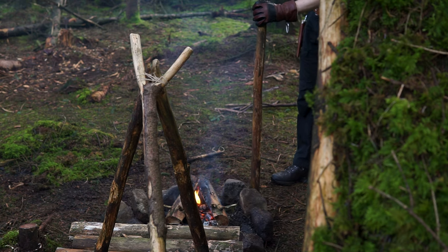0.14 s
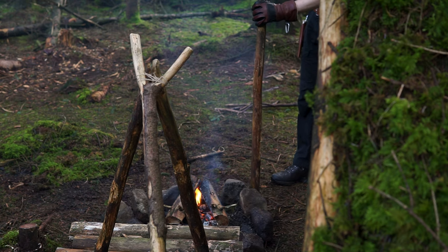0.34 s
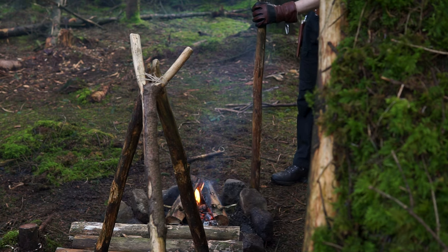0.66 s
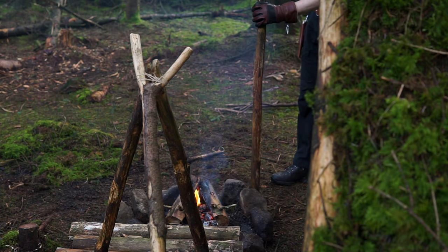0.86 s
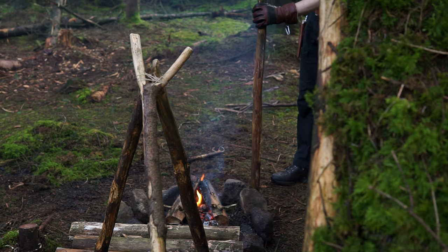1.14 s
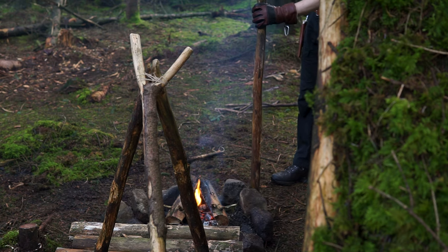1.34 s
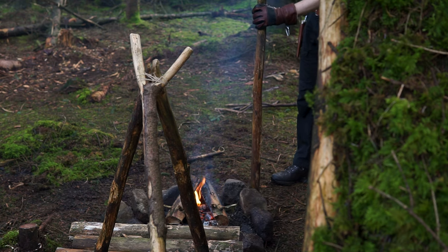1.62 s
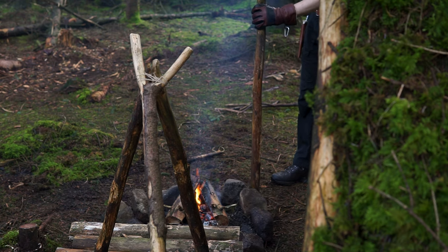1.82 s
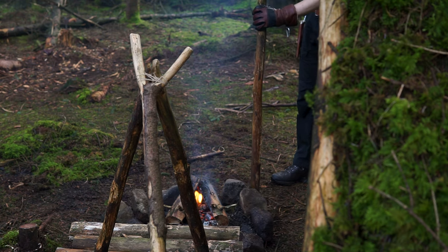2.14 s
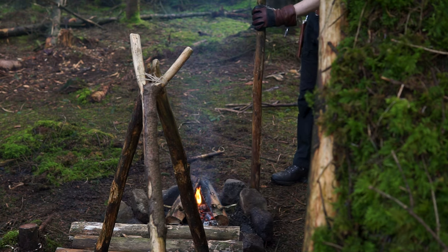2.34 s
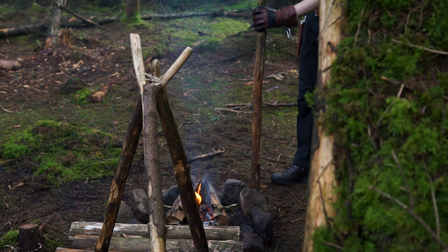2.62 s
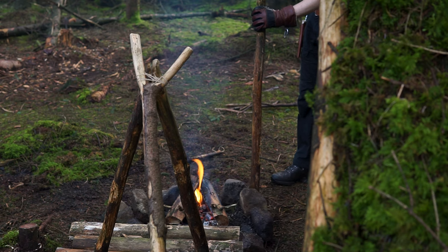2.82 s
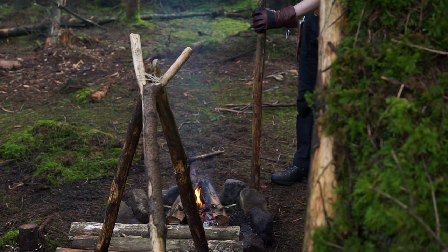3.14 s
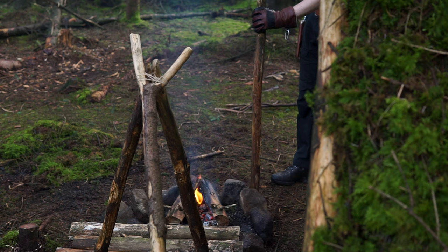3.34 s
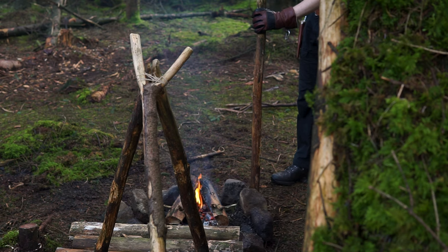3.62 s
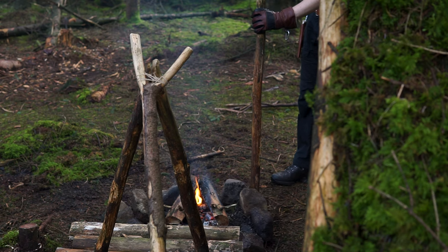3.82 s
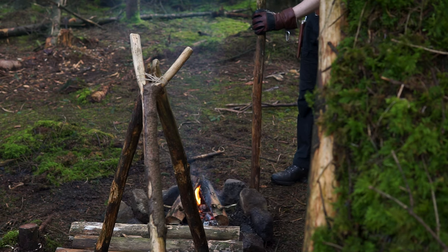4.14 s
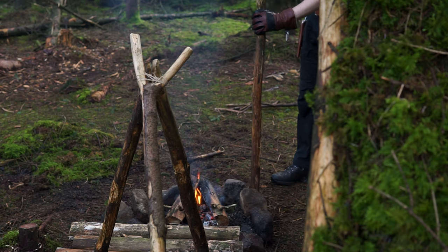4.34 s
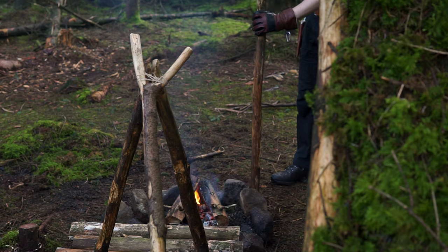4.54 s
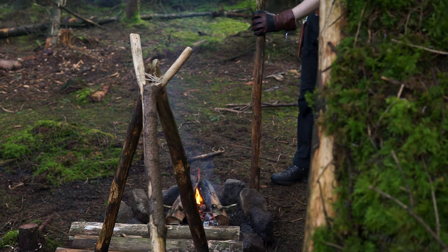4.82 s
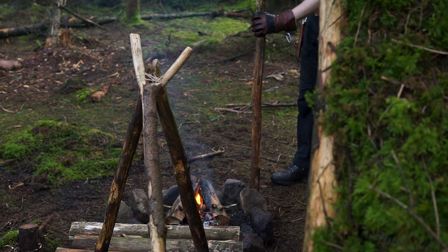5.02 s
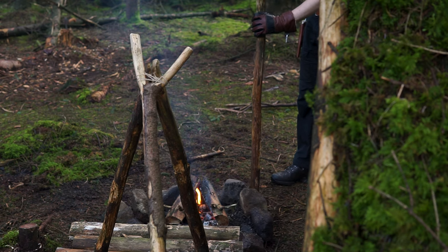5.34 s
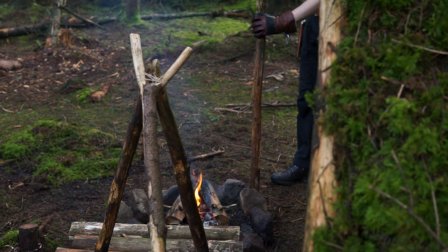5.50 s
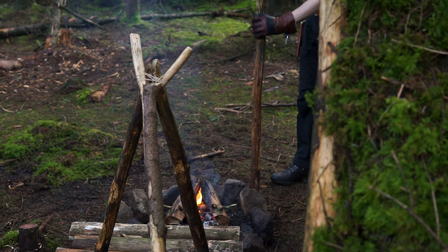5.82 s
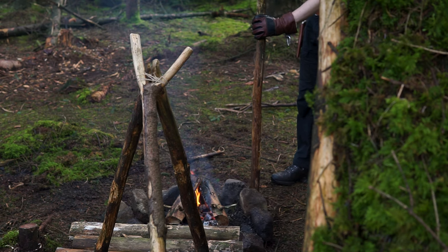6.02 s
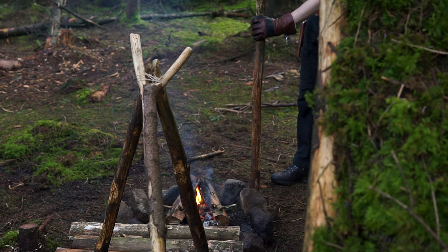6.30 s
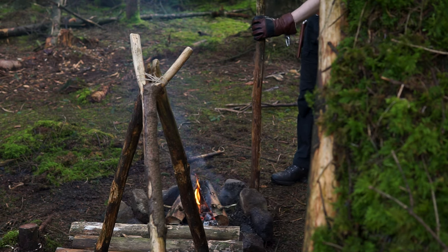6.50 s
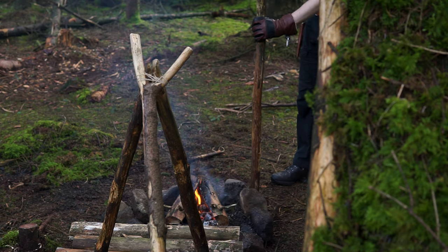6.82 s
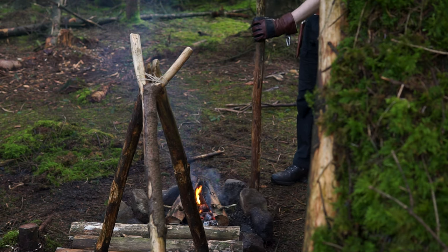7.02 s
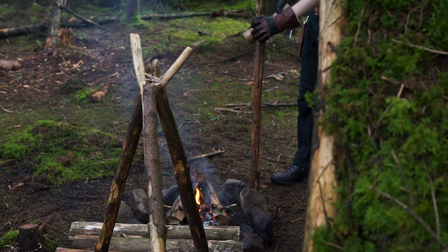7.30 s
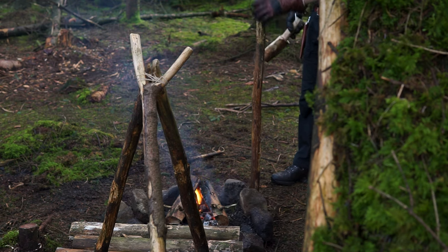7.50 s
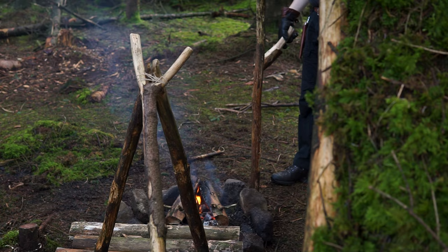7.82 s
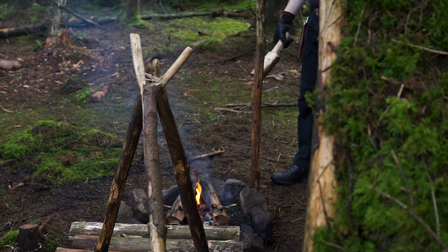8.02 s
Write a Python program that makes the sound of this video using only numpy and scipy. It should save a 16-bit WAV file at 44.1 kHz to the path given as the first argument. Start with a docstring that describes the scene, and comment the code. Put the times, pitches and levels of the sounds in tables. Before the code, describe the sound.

A wooden mallet drives a stake into forest ground, very close to the microphone. Fifteen blows fall evenly, about two a second, from 0.2 to 6.9 seconds. Each is a loud, slightly overloaded wooden knock with a brief ring and a bright crack, followed at once by a soft, dull bounce and a short echo from the trees. The hardest land at about 3 and 4 seconds, and the crack grows a little brighter as the stake sinks. Underneath runs a faint murmur of air, with a barely audible low gust from about 1 to 4 seconds. A small fire nearby ticks lightly throughout, with clearer dry snaps around 2.1, 3.6 and 7.8 seconds. After the hammering ends, a sleeve rustles quietly in a few short strokes from about 7.5 to 8.1 seconds.

```python
"""Driving a stake by a camp fire

Close to the microphones, a wooden mallet drives a stake into the forest floor: fifteen blows, two a
second. Each rings the stake and overloads the input; the mallet bounces and lands again softly, and the
trees scatter the sound back. The deeper the stake, the brighter the crack and the longer the bounce.
A small fire snaps over a murmur of air, one gust passes, and a sleeve rustles after the last blow."""
import sys
import numpy as np
from scipy import signal
from scipy.io import wavfile
from scipy.ndimage import uniform_filter1d

SR = 44100
rng = np.random.default_rng(int(sys.argv[2]) if len(sys.argv) > 2 else 0)


def file_out(sig):
    """Save sig as 16-bit WAV at sys.argv[1]."""
    # one column per channel
    cols = np.atleast_2d(sig).T
    # limit, then scale
    lim = np.clip(cols, -1, 1)
    pcm = np.round(lim * 32767).astype(np.int16)
    wavfile.write(sys.argv[1], SR, pcm)


N = 359856

# spectrum of the forest air: f/Hz, level/dB
AIR_SPECTRUM = [(18, -46.5), (30, -3.5), (505, -0.5), (622, -7.5), (709, -5.5), (897, -7.5), (1080, -7.5),
                (1170, -11.5), (2360, -20), (2550, -21.5), (3880, -25.5), (5310, -24), (6210, -28.5),
                (12300, -26.5), (15500, -32.5)]
# how alike the air is at the two microphones: f/Hz, likeness
AIR_LIKENESS = [(60, 0.96), (180, 1), (550, 0.24), (1650, 0.18), (4970, 0.17), (15000, 0.97)]
# strokes of the sleeve: t/s, length/s, level/dB, upper band edge f/Hz
SLEEVE_STROKES = [(7.451, .14, -68, 2400), (7.655, .15, -59.5, 2900), (7.984, .19, -58, 1750),
                  (8.09, .03, -50, 1650)]
# clear snaps of the fire: t/s, level/dB, brightness f/Hz, left-right/dB
FIRE_SNAPS = [(1.1902, -33, 5170, -2), (1.9937, -33.5, 8600, 3), (2.1179, -16.5, 9650, 2),
              (3.463, -34.5, 7950, 3), (3.5567, -21, 5000, 1), (3.6251, -12.5, 5090, 1.5),
              (4.3552, -32.5, 8350, 3.5), (5.5807, -30.5, 4050, 6), (5.828, -37.5, 8990, 0),
              (6.4801, -33, 4640, 10), (7.012, -34, 5120, 3), (7.051, -40, 11100, 1.5),
              (7.8423, -27.5, 10670, -2)]
# what the trees send back of the knock: f/Hz, level/dB
KNOCK_ECHO = [(100, -50.5), (300, -26), (450, -24.5), (600, -17.5), (780, -18), (1050, -15.5), (1350, -23),
              (1700, -24.5), (2200, -35), (3000, -40), (6000, -53.5), (15000, -71)]
# what they send back of the crack: f/Hz, level/dB
CRACK_ECHO = [(600, -43.5), (1500, -28), (2700, -29), (4000, -28), (6500, -28.5), (10000, -30.5),
              (15000, -35)]
# how long the echo lasts: f/Hz, t60/s
ECHO_T60 = [(200, 0.92), (900, 0.54), (2000, 0.66), (5000, .52), (10000, 0.3), (15000, .25)]
# how alike the echo is at the two microphones: f/Hz, likeness
ECHO_LIKENESS = [(60, 0.97), (180, 0.33), (550, 0.54), (1650, 0.42), (4970, 0.14), (15000, 0.42)]
# bending modes of the stake: f/Hz, level/dB, t60/ms before soil damping, left-right/dB,
# change from first blow to last/dB
STAKE_MODES = [(135, -6.5, 26, -1, -4), (194.3, -8.5, 59, 0.7, -2.5), (283.3, -4, 47.1, -5.5, 1),
               (305.5, 10.5, 12.2, 4.5, -2.5), (339, -1.5, 55, -8.5, 1.5), (465.8, 20, 10, -3, -1.37),
               (585.7, 14, 34.2, -3.5, 0.77), (615.1, 7, 40, 2.3, -0.35), (654.5, -0.92, 37, -9.5, 1.63),
               (740.6, 17.5, 16.2, 1.2, -0.8), (826.3, 8, 28, -3.5, 0.5), (873.4, 6.5, 46, -6.5, 0.5),
               (891, -4, 110, 5.5, 0.33), (1111.2, -5.5, 80, -3, -4.5), (1126.6, -2.54, 43.8, 1.86, -2.5),
               (1183, 4, 24, 3.5, -1.0), (1383, -9.5, 68, -4.5, -3), (1478.7, 5, 20, 1.46, -1.1),
               (1598, -6.5, 54.3, 5.5, -0.94), (1736.6, 9.5, 27.1, -0.5, -2.5),
               (1860, 9.5, 15.1, -1.5, -1.25), (2014.3, 19.5, 12.0, -1.5, -1.44),
               (2249, 2, 16.5, -0.06, -2.5), (2556, 14, 10, -5.5, -0.9), (2750.6, 13, 10, 3.5, -2.1),
               (3238, -5, 26, -8.5, -1.25)]
# mallet blows: t/s, force/dB, crack level/dB, second touch level/dB
MALLET_BLOWS = [(.1524, -.8, -10.5, -26), (.6351, 1.3, -3.5, -17.5), (1.1142, 1.7, -6.5, -24),
                (1.584, .3, -6, -19), (2.0676, 1, -6.5, -22), (2.5461, 1.6, -7, -20),
                (3.0282, 2.3, -1, -14), (3.5105, -1.4, -12, -33.5), (3.9985, 3.8, -.5, -14.3),
                (4.4814, -.5, -10.5, -27), (4.9643, -1.2, -16, -34), (5.439, 1.7, -5.5, -28),
                (5.9158, -1, -10, -31), (6.3886, -.9, -10.5, -27), (6.8605, .5, -11, -25)]


def draught(start_db=-55, fade_db_per_s=.25, gust_db=8, band_hz=(15, 52)):
    """Moving air buffets the microphones, far down in the bass; one gust rises, holds and falls."""
    t = np.arange(N) / SR
    gust = np.interp(t, [.95, 1.25, 3.7, 4.3], [0, 1, 1, 0])
    buffets = filtered(rng.standard_normal(N) + .5 * rng.standard_normal((2, N)), band_hz, "band")
    return gain_of(start_db - fade_db_per_s * t + gust_db * gust) * evened(buffets)


def air(start_db=-54.4, fade_db_per_s=.22, patchy_db=1.0):
    """All around, a low murmur of moving air with drifting patches and a faint hiss, slowly calming."""
    def field_db(hz, t):
        patches = uniform_filter1d(rng.standard_normal((len(hz), len(t))), size=12, axis=0)
        drifting = evened(uniform_filter1d(patches, size=10, axis=1))
        return read(AIR_SPECTRUM, hz) + patchy_db * drifting
    level_db = start_db - fade_db_per_s * np.arange(N) / SR
    return gain_of(level_db) * evened(noise_pair(N, AIR_LIKENESS, field_db, size=2048))


def sleeve(grain_db=3):
    """Cloth slides in short, grainy strokes as the mallet is lowered."""
    out = np.zeros((2, N))
    for s, length, db, hz in SLEEVE_STROKES:
        progress = np.linspace(0, 1, round(length * SR))
        roughness = evened(uniform_filter1d(rng.standard_normal(len(progress)), size=150))
        rub = rng.standard_normal(len(progress)) + .55 * rng.standard_normal((2, len(progress)))
        rustle = filtered(rub * gain_of(grain_db * roughness), [hz * .72, hz], "band", order=1)
        add(out, s, gain_of(db) * np.sin(np.pi * progress ** .78) * evened(rustle))
    return out


def snap(brightness_hz, t60=.0076, scatter_db=-24, scatter_t60=.03):
    """A pocket of gas bursts in the firewood: a broad, dry tick and its scatter off logs and stones."""
    t = np.arange(SR // 20) / SR
    decay = gain_of(-60 * t / t60) + gain_of(scatter_db - 60 * t / scatter_t60)
    burst = decay * (rng.standard_normal(len(t)) + 1.7 * rng.standard_normal((2, len(t))))
    top_hz = min(1.2 * brightness_hz + 2000, 12000)
    tick = filtered(filtered(burst, 4400, "high"), top_hz, "low")
    return 3.5 * tick / np.linalg.norm(tick)  # peaks near 1


def fire(ticks_per_s=16, faintest_db=-55, spread_db=13):
    """The small fire nearby: a few clear snaps among many faint ticks at random moments."""
    out = np.zeros((2, N))
    for s, db, hz, pan_db in FIRE_SNAPS:
        add(out, s, gain_of(db) * panned(pan_db) * snap(hz))
    for when, size, pitch in rng.random((round(ticks_per_s * N / SR), 3)):
        add(out, when * N / SR, gain_of(faintest_db + spread_db * size ** 2) * snap(6000 + 5000 * pitch))
    return out


def forest_echo(echo_db, crack_db, top_hz, build_s=.014, uneven_db=1.23):
    """Trunks farther off blur the knock and crack; their echoes build, then die away, treble first."""
    def field_db(hz, t):
        knock = gain_of(read(KNOCK_ECHO, hz) + echo_db)
        splinter = gain_of(read(CRACK_ECHO, hz) + crack_db) / np.hypot(1, (hz / top_hz) ** 3)
        # the trunks stand at uneven distances, so their echoes come in clumps
        clumps = evened(uniform_filter1d(rng.standard_normal(len(t)), size=4))
        return 20 * np.log10(np.hypot(knock, splinter)) - 60 * t / read(ECHO_T60, hz) + uneven_db * clumps
    t = np.arange(SR * 3 // 4) / SR
    build_up = 1 - np.exp(-(t / build_s) ** 2)
    return build_up * noise_pair(len(t), ECHO_LIKENESS, field_db, size=512)


def second_touch(ring, touch_db, low_hz=190, soft_hz=850, damped_t60=.022):
    """The mallet lands again slowly and stays on the stake: a damped thud, the softer the duller."""
    t = np.arange(ring.shape[1]) / SR
    top_hz = soft_hz * gain_of(touch_db / 4)
    thud = filtered(ring * gain_of(-60 * t / damped_t60), low_hz, "high")
    return gain_of(touch_db) * filtered(thud, top_hz, "low", order=3)


def crack(top_hz, trim_db=-17, low_hz=1800, t60=.13):
    """Fibres crush where the mallet meets the end grain: a short bright burst."""
    t = np.arange(SR // 8) / SR
    grains = rng.standard_normal(len(t)) + .6 * rng.standard_normal((2, len(t)))
    burst = filtered(grains * gain_of(trim_db - 60 * t / t60), low_hz, "high")
    return filtered(burst, top_hz, "low")


def stake_ring(depth, scatter_db=.87, rise_ms=.537, soil_t60_ms=300):
    """The struck stake rings in its bending modes, and the soil damps each a little more."""
    ms = np.arange(SR // 8) * 1000 / SR
    ring = np.zeros((2, len(ms)))
    for hz, db, t60_ms, pan_db, change_db in STAKE_MODES:
        # the mallet never lands on quite the same spot, which matters most to the high modes
        level_db = db + change_db * depth + scatter_db * rng.standard_normal() * hz / 2000
        # bending waves are dispersive: low modes arrive late, so the knock sweeps downward
        age_ms = np.maximum(ms - .943 * (np.sqrt(1000 / hz) - .5), 0)
        envelope = gain_of(level_db - 60 * age_ms / t60_ms) * (1 - np.exp(-age_ms / rise_ms))
        ring -= panned(pan_db) * envelope * np.sin(2 * np.pi * hz * age_ms / 1000)
    ring *= gain_of(-60 * ms / soil_t60_ms)
    echoed = ring.copy()
    add(echoed, .00266, .225 * ring)  # the trunk alongside throws back one close echo
    return echoed


def mallet():
    """Close up, each blow rings and cracks the stake; the mallet drops back and the forest answers."""
    out = np.zeros((2, N))
    depths = np.linspace(-.5, .5, len(MALLET_BLOWS))  # the stake sinks; 0 is halfway
    for depth, (s, force_db, crack_db, touch_db) in zip(depths, MALLET_BLOWS):
        # a firmer stake and a harder blow crack brighter
        top_hz = 5500 * 2 ** (1.2 * depth + .18 * force_db)
        # a firmer stake throws the mallet higher; a hard swing follows through
        bounce_s = .0524 + .0189 * depth - .0019 * force_db
        # the echo follows the force and fades as less of the stake stands free
        echo_db = -.7 - 1.4 * depth + .8 * force_db
        ring = stake_ring(depth)
        add(out, s, gain_of(force_db) * ring + gain_of(crack_db) * crack(top_hz))
        add(out, s + bounce_s, second_touch(ring, touch_db))
        add(out, s, forest_echo(echo_db, crack_db, top_hz))
    # the sound reaches the right microphone a moment after the left
    return np.array([out[0], np.roll(out[1], 1)])


def scene():
    """A microphone pair in the forest: air all around, sleeve and fire nearby, the stake up close."""
    return draught() + air() + sleeve() + fire() + mallet()


def record(dry, overload=.95, wind_filter_hz=230, edge_hz=15950):
    """The input overloads, the wind filter tilts the flat tops, and peaks clip again at full scale."""
    overloaded = np.clip(dry, -overload, overload)
    clipped = np.clip(filtered(overloaded, wind_filter_hz, "high"), -1, 1)
    treble_cut = signal.firwin(511, edge_hz, window=("kaiser", 7), fs=SR)
    return signal.oaconvolve(clipped, treble_cut[None], "same")


def gain_of(db):
    """Decibels to a factor."""
    return 10 ** (np.asarray(db) / 20)


def evened(x):
    """Scales to an rms of 1."""
    return x / np.sqrt(np.mean(x ** 2) + 1e-20)


def read(points, hz):
    """Reads a table along a log-frequency axis."""
    f, value = np.transpose(points)
    return np.interp(np.log(hz + 1), np.log(f), value)


def add(mix, s, sound):
    """Adds a sound to both channels at time s."""
    part = mix[:, max(round(s * SR), 0):][:, :sound.shape[-1]]
    part += sound[..., :part.shape[1]]


def panned(pan_db):
    """Left and right gains for a level difference."""
    return gain_of(np.array([[pan_db], [-pan_db]]) / 2)


def filtered(x, hz, kind, order=2):
    """Butterworth filter."""
    sections = signal.butter(order, np.minimum(hz, SR / 2 - 1000), kind, fs=SR, output="sos")
    return signal.sosfilt(sections, x)


def noise_pair(length, likeness, field_db, size):
    """Partly alike left and right noise, shaped by a dB field over frequency and time."""
    frames = dict(fs=SR, nperseg=size, noverlap=size * 3 // 4)
    hz, t, (left, other) = signal.stft(rng.standard_normal((2, length)), **frames)
    same = np.clip(read(likeness, hz), -1, 1)[:, None]
    right = same * left + np.sqrt(1 - same ** 2) * other
    shaped = np.array([left, right]) * gain_of(field_db(hz[:, None], t))
    return signal.istft(shaped, **frames)[1][:, :length]


dry = scene()
out = record(dry)
file_out(out)
```